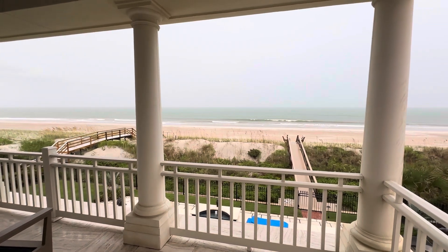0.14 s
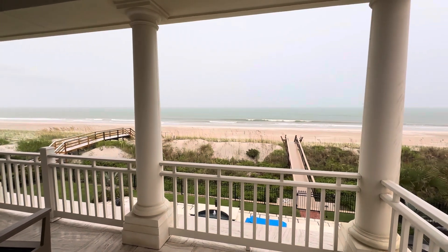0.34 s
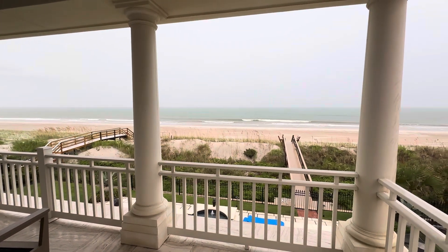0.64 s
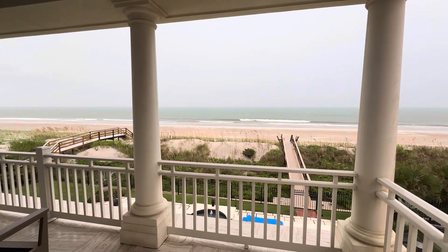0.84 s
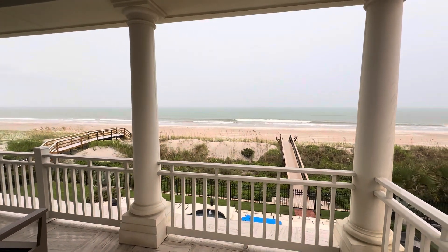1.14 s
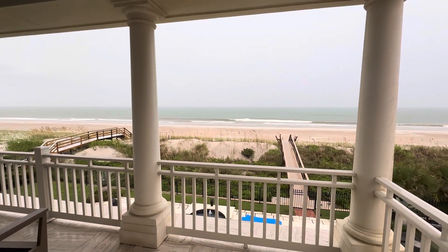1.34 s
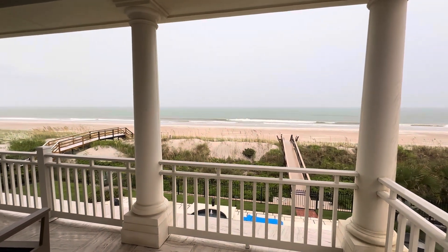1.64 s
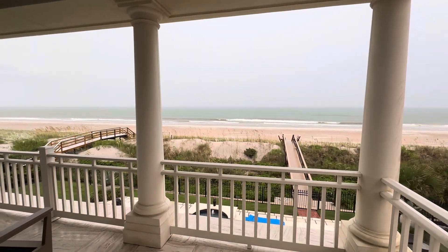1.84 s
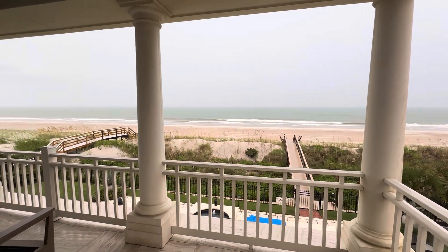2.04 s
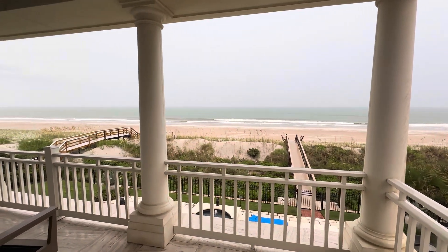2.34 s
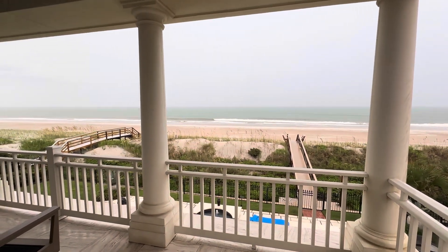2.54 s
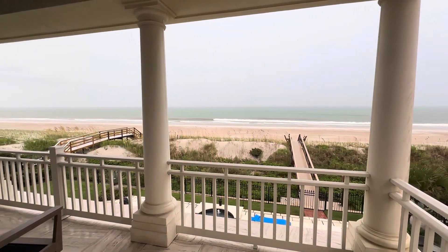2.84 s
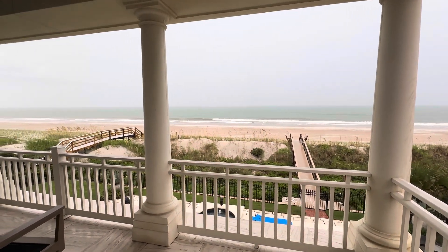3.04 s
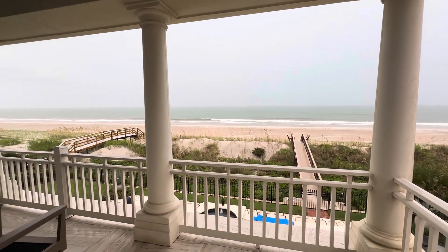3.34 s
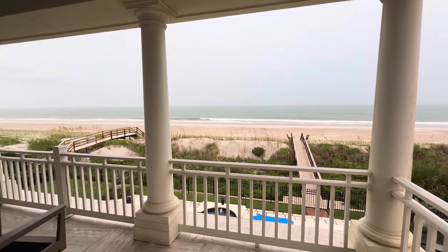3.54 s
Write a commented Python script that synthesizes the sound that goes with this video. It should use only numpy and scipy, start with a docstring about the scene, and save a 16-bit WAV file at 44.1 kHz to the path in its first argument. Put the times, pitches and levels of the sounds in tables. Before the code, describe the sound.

Low thunder rumbles from the start, swelling into dull bassy booms around 0.3-0.6 seconds, then easing. From about 1.2 it surges, loudest near 1.4-1.7, with brighter, muffled claps ringing briefly under the porch roof. It then dies away unevenly, with smaller thumps near 2.8-3.1. Soft surf and fine hiss run throughout, the hiss brighter on the right; a faint tick occurs near 0.1.

```python
"""Thunder rolls over a beach, heard from a covered wooden porch. Random shock fronts from the lightning channel
merge into an opening swell, a deep rumble and a brighter roll; bunches of them make dull booms, and from the
height of the roll on also brighter claps and cracks that ring under the roof. Behind, filtered noise makes
churning surf with breaking waves and a fine hiss, brighter on the right. One faint tick sounds early on.
Table levels are those before panning, porch echo and the final low-pass."""
import sys
import numpy as np
from scipy import signal
from scipy.fft import rfft, irfft, next_fast_len
from scipy.io import wavfile
from scipy.ndimage import uniform_filter1d

SR = 44100
rng = np.random.default_rng(int(sys.argv[2]) if len(sys.argv) > 2 else 0)


def store_pcm(level_fs):
    """Save levels as 16-bit WAV."""
    pcm = np.round(np.clip(level_fs, -1, 1) * 32767).astype(np.int16)
    wavfile.write(sys.argv[1], SR, np.atleast_2d(pcm).T)


N = 163170


def undb(db):
    """Decibels to gain."""
    return 10 ** (np.asarray(db) / 20)


def unit(x):
    """Scale to rms 1."""
    return x / np.sqrt(np.mean(x ** 2))


def curve(rows):
    """Gain over time, straight in dB between (time [s], level [dB]) points."""
    return undb(np.interp(np.arange(N) / SR, *np.array(rows).T))


def colour(x, points):
    """Causal minimum-phase filter through (frequency [Hz], gain [dB]) points."""
    size = next_fast_len(N + SR // 2, True)
    hz, db = np.array(points).T
    f = np.maximum(np.arange(size // 2 + 1) * SR / size, 1)
    gain_db = np.interp(np.log(f), np.log(hz), db)
    # folding the cepstrum onto positive time makes the response causal
    cepstrum = irfft(np.log(undb(gain_db)), size)
    cepstrum[1:size // 2] *= 2
    cepstrum[size // 2 + 1:] = 0
    response = np.exp(rfft(cepstrum))
    return irfft(rfft(x, size) * response, size)[..., :N]


def pitched(points, pitch):
    """Shift a colour along the frequency axis; a lower factor is duller."""
    return [(hz * pitch, gain) for hz, gain in points]


def walk(rate):
    """Smooth random drift of rms 1, from twice-averaged random steps at the given rate [1/s]."""
    k = max(int(SR / rate), 1)
    steps = np.repeat(rng.standard_normal(1024), k)[:N]
    return unit(uniform_filter1d(uniform_filter1d(steps, k), k))


def pan(db):
    """Left and right gains for a level difference, positive to the left."""
    return undb(np.array([[db], [-db]]) / 2)


CHURN_DB, CHURN_PER_S = 1.1, 22  # rms swing [dB], random steps per second


def churn(points):
    """Tumbling water in stereo: each half octave of the noise swells and sinks on its own."""
    size = next_fast_len(N, True)
    spectrum = rfft(colour(rng.standard_normal((2, N)), points), size)
    hz = np.arange(size // 2 + 1) * SR / size
    # everything below 260 Hz or above 4 kHz joins the outermost bands
    band = np.floor(2 * np.log2(np.clip(hz, 260, 4000))).astype(int)
    water = 0
    for k in np.unique(band):
        part = irfft(spectrum * (band == k), size)[:, :N]
        water = water + part * undb(CHURN_DB * walk(CHURN_PER_S))
    return unit(water)


# colour of a breaking wave: (frequency [Hz], relative gain [dB])
BREAKER_TONE = [(400, -27), (900, -15), (1400, 6), (1750, -2), (2300, 1.5), (2700, -13), (4000, -9),
                (5500, -25), (10000, -53)]
WAVE_RISE_S, WAVE_FADE_S = 0.32, 0.85  # Gaussian rise width, exponential fade time


def breaker(at, db, pitch):
    """A wave topples in a swelling rush of noise, which then fades exponentially."""
    t = np.arange(N) / SR - at
    rise = np.exp(-(t / WAVE_RISE_S) ** 2)
    fade = np.exp(-np.abs(t) / WAVE_FADE_S)
    shape = np.where(t < 0, rise, fade)
    return churn(pitched(BREAKER_TONE, pitch)) * shape * undb(db)


# colour of the surf's wash: (frequency [Hz], relative gain [dB])
SURF_TONE = [(60, -9.5), (200, 0.5), (380, -10.5), (520, -2), (650, -1), (920, 0.5), (1050, -5), (1350, -3),
             (1700, -6), (2100, -7), (2550, -12), (2850, -11), (3300, -18.5), (5000, -19), (9000, -35),
             (16000, -60)]
# swell of the wash: (time [s], level [dB])
SURF_SWELL = [(0, -35.5), (.3, -35.5), (.62, -33), (1.15, -31.5), (1.55, -34), (1.9, -32), (2.4, -31.5),
              (3.05, -33.5), (3.7, -34.5)]
# breaking waves, the farther one duller: (peak time [s], level [dB], pitch factor [ratio])
BREAKING_WAVES = [(.67, -37.3, 1.0), (2.2, -45.5, 1.15), (3.3, -38.5, 0.597)]


def surf():
    """A wide, churning wash of noise with waves breaking in it."""
    wash = churn(SURF_TONE) * curve(SURF_SWELL)
    waves = sum(breaker(*row) for row in BREAKING_WAVES)
    return (wash + waves) * pan(db=-1.5)


# colour of the hiss on the left: (frequency [Hz], relative gain [dB])
HISS_TONE_LEFT = [(1500, -9.5), (3300, -2), (4500, -12), (6000, -15.5), (7500, -8), (9000, -21.5),
                  (10500, -16), (12500, -35), (15500, -23)]
# colour of the hiss on the right: (frequency [Hz], relative gain [dB])
HISS_TONE_RIGHT = [(1500, -7), (3300, -9), (4400, -2), (5400, 2.5), (6300, 0), (7500, -5.5), (9000, -16.5),
                   (10500, -25), (12500, -28), (15500, -26.5)]
# swell of the hiss: (time [s], level [dB])
HISS_SWELL = [(0, -44), (.3, -43.5), (.6, -41), (1.3, -41.5), (1.75, -42), (2.05, -40), (2.7, -42.5),
              (3.7, -43)]
# brief flares of the hiss: (time [s], boost [dB], half width [s])
HISS_FLARES = [(1.51, 3, 0.022), (2.003, 3, 0.005)]


def hiss():
    """Fine hiss of foam and wind: noise brighter on the right, drifting in level, with brief flares."""
    t = np.arange(N) / SR
    left = colour(rng.standard_normal(N), HISS_TONE_LEFT)
    right = colour(rng.standard_normal(N), HISS_TONE_RIGHT)
    flare_db = sum(db * np.exp(-((t - at) / width) ** 2) for at, db, width in HISS_FLARES)
    drift_db = 0.68 * walk(22.78)
    return unit(np.array([left, right])) * curve(HISS_SWELL) * undb(flare_db + drift_db)


# early reflections of surf and hiss on the left: (delay [s], level [dB])
BOARDS_LEFT = [(.0047, -16), (.0093, -20), (0.0157, -21)]
# early reflections of surf and hiss on the right: (delay [s], level [dB])
BOARDS_RIGHT = [(.0039, -31), (.0108, -15.5), (0.0145, -19.5)]


def reflected(pair):
    """The nearest boards mirror the steady sounds; delayed copies give a slightly hollow colour."""
    sides = []
    for x, rows in zip(pair, (BOARDS_LEFT, BOARDS_RIGHT)):
        copies = sum(undb(db) * np.roll(x, int(delay * SR)) for delay, db in rows)
        sides.append(unit(x + copies) * np.std(x))  # the overall level stays as it was
    return np.array(sides)


# colour of the tick: (frequency [Hz], relative gain [dB])
TICK_TONE = [(1500, -40), (2600, -7), (3100, 1), (3500, -16), (6000, -26), (16000, -60)]
TICK_S, TICK_HALF_WIDTH_S, TICK_DB = .118, .005, -40


def tick():
    """One short, faint tick: coloured noise under a Gaussian bump."""
    t = np.arange(N) / SR - TICK_S
    noise = unit(colour(rng.standard_normal(N), TICK_TONE))
    return noise * np.exp(-(t / TICK_HALF_WIDTH_S) ** 2) * undb(TICK_DB)


SHOCKS_PER_S, SHOCK_SPREAD_DB = 1800, 2  # mean rate, rms spread of strength


def shocks():
    """Shock fronts that arrive at random, of either sign and uneven strength."""
    arrives = rng.random(N) < SHOCKS_PER_S / SR
    sign = np.sign(rng.standard_normal(N))
    return arrives * sign * undb(SHOCK_SPREAD_DB * rng.standard_normal(N))


# porch resonances: (frequency [Hz], width [Hz], gain at the centre [dB])
ROOF_MODES = [(289, 10, .5), (365.3, 7, -.5), (650, 16, -8.5)]


def ring(x):
    """Sound under the porch roof rings at a few pitches, added by resonant filters."""
    return x + sum(undb(db) * signal.lfilter(*signal.iirpeak(hz, hz / width, SR), x)
                   for hz, width, db in ROOF_MODES)


def rolling(levels, points, even_s):
    """A stream of shocks dulled by distance; it flutters quickly while its mean strength follows the swell."""
    x = unit(ring(colour(shocks(), points)))
    mean_power = uniform_filter1d(x ** 2, max(int(even_s * SR), 2))
    return x / np.sqrt(np.maximum(mean_power, 1e-6)) * curve(levels)


def burst(start, db, length, points, tail_s, pitch=1):
    """A bunch of shocks from one bend of the channel: sudden start, hold, quick exponential fall."""
    t = np.arange(N) / SR
    shape = (t >= start) * np.exp(-np.maximum(t - start - length, 0) / tail_s)
    x = ring(colour(shocks() * shape, pitched(points, pitch)))
    # the level is the rms spread over hold plus tail
    return x * undb(db) * np.sqrt((length + tail_s) * SR / np.sum(x ** 2))


# level of the opening swell: (time [s], level [dB])
OPENING_SWELL = [(0, -38), (.2, -27), (.33, -24), (.6, -25), (.88, -28), (1.15, -33.5), (1.7, -37),
                 (3.7, -71)]
# its colour, a little higher in pitch than the rumble: (frequency [Hz], relative gain [dB])
OPENING_TONE = [(20, -39), (50, -16), (75, 1.5), (96, 4.5), (125, 4), (165, -6), (205, -11), (260, -7.5),
                (350, -32.5), (450, -50), (800, -57), (5000, -120)]


def opening():
    """The opening swell: a stream of shocks that soon sinks away."""
    return rolling(OPENING_SWELL, OPENING_TONE, even_s=0.043)


# level of the deep rumble: (time [s], level [dB])
RUMBLE_SWELL = [(0, -28.5), (.25, -34), (.55, -32.5), (.72, -25.5), (1.0, -26), (1.17, -31), (1.34, -20),
                (1.62, -23), (1.78, -24), (1.92, -23), (2.1, -27), (2.31, -33.5), (2.38, -28), (2.9, -29.5),
                (3.25, -28), (3.38, -27), (3.7, -34)]
# colour of the rumble: (frequency [Hz], relative gain [dB])
RUMBLE_TONE = [(15, -45), (30, -21.5), (45, -8), (64, 1.5), (86, 0), (128, -4.5), (170, -10.5), (250, -21),
               (400, -40.5), (800, -62), (5000, -120)]


def rumble():
    """Countless shocks merged into a deep rumble."""
    return rolling(RUMBLE_SWELL, RUMBLE_TONE, even_s=0.065)


# booms: (start time [s], level [dB], length [s])
BOOM_HITS = [(0.297, -21.5, 0.011), (.321, -16, 0.017), (0.383, -24, .02), (0.421, -21, 0.017),
             (0.463, -19, .024), (0.543, -21, 0.012), (1.324, -19, .018), (1.574, -17, 0.019),
             (1.847, -22, 0.024), (2.022, -23, 0.02), (2.18, -22, 0.019), (2.367, -32, 0.01),
             (2.885, -28.5, 0.0067), (2.931, -24.5, 0.0078), (3.124, -27, 0.012), (3.621, -35, 0.022)]
# colour of the booms: (frequency [Hz], relative gain [dB])
BOOM_TONE = [(20, -41), (50, -25), (76, 0.5), (110, 4.5), (150, -4.5), (220, -22.5), (400, -43), (800, -66),
             (5000, -120)]


def booms():
    """Dull booms: bunched shocks with only the bass left."""
    return sum(burst(start, db, length, BOOM_TONE, tail_s=0.0063) for start, db, length in BOOM_HITS)


# level of the brighter roll: (time [s], level [dB])
ROLL_SWELL = [(0, -35.5), (.12, -39), (.22, -34), (.6, -35.5), (1.19, -34), (1.26, -23), (1.39, -20.5),
              (1.53, -27), (1.63, -28), (1.7, -24.5), (1.87, -30), (2.1, -31), (2.33, -33.5), (2.48, -32.5),
              (2.62, -33.5), (2.85, -33), (3.05, -32.5), (3.7, -33.5)]
# colour of the roll: (frequency [Hz], relative gain [dB])
ROLL_TONE = [(30, -30.5), (55, -33.5), (110, -8), (165, -1.5), (200, -2), (235, 2), (290, -2.5), (330, -2),
             (390, -4.5), (445, -8), (520, -15), (680, -11.5), (900, -24.5), (1400, -38), (3000, -67.5),
             (10000, -115)]


def roll():
    """The brighter roll: a stream of shocks that keeps more of its middle range."""
    return rolling(ROLL_SWELL, ROLL_TONE, even_s=.05)


# claps: (start time [s], level [dB], length [s], pitch factor [ratio])
CLAP_HITS = [(1.235, -26, .03, 1.2), (1.32, -18, 0.025, 1.05), (1.363, -22, 0.062, .87),
             (1.44, -12, 0.036, 0.984), (1.482, -16.5, .009, 1.01), (1.557, -15, 0.039, 1.05),
             (1.656, -17, 0.02, 0.81), (1.794, -27.5, 0.04, 1.05), (1.91, -22.5, 0.0089, 0.92),
             (1.948, -25, 0.033, 0.81), (2.121, -28, .025, 0.88), (2.24, -31.5, 0.0079, 1.25),
             (2.385, -29.5, .035, .76), (2.427, -23, 0.03, 0.94), (2.496, -31, 0.031, 1.23),
             (2.658, -30.5, 0.037, 0.84), (2.77, -27, 0.024, 0.76), (2.786, -20.5, .028, .84),
             (2.83, -27, 0.021, 0.89)]
# colour of the claps at pitch factor 1: (frequency [Hz], relative gain [dB])
CLAP_TONE = [(20, -54), (45, -16), (100, -13.5), (165, -1.5), (200, -5), (235, 3), (290, 3), (335, -6),
             (380, -6), (445, -12.5), (530, -27.5), (720, -19.5), (950, -33.5), (1500, -40), (3000, -74),
             (10000, -120)]


def claps():
    """Brighter claps: bunched shocks, each with its own pitch."""
    return sum(burst(start, db, length, CLAP_TONE, tail_s=0.0053, pitch=pitch)
               for start, db, length, pitch in CLAP_HITS)


# cracks beside the big claps: (start time [s], level [dB], length [s])
CRACK_HITS = [(1.442, -28.5, 0.019), (1.559, -32.5, 0.019), (1.643, -34, 0.014)]
# colour of the cracks: (frequency [Hz], relative gain [dB])
CRACK_TONE = [(100, -26), (400, -10), (520, -8), (620, 3.5), (720, -3), (860, -4), (1000, -20), (1500, -26),
              (10000, -110)]


def cracks():
    """The sharpest shock fronts: bursts higher in pitch, with the shortest tail."""
    return sum(burst(start, db, length, CRACK_TONE, tail_s=0.0034) for start, db, length in CRACK_HITS)


# sideways echo of the porch against the direct sound: (frequency [Hz], gain [dB])
PORCH_SIDE_TONE = [(30, -19), (90, -15.5), (175, -6.5), (280, -14), (370, -6.5), (490, 5.5), (650, -5.5),
                   (1000, -2)]
PORCH_T60_S, PORCH_DELAY_S = 0.16, 0.0075  # decay and onset of the noise before its spectrum is flattened


def porch(x):
    """Roof, floor and wall throw a short noise-like echo, opposite in sign at left and right."""
    t = np.arange(SR // 2) / SR
    decay = np.exp(-np.log(1000) * t / PORCH_T60_S)
    echo = rng.standard_normal(len(t)) * decay * (t > PORCH_DELAY_S)
    # keep the phase only, so that the echo has no colour of its own
    even_echo = irfft(np.exp(1j * np.angle(rfft(echo))))[:len(t) // 2]
    side = colour(signal.fftconvolve(x, even_echo)[:N], PORCH_SIDE_TONE)
    return np.array([x + side, x - side])


def thunder():
    """Swell, rumble and booms below, roll, claps and cracks above, each group with its own porch echo."""
    low = opening() + rumble() + booms()
    high = roll() + claps() + cracks()
    return porch(low) * pan(db=2.0) + porch(high) * pan(db=0.05)


def scene():
    """Thunder over surf and hiss, with one tick."""
    return reflected(surf() + hiss()) + tick() + thunder()


def record(dry):
    """A steep low-pass leaves nothing above about 15.7 kHz."""
    return signal.sosfilt(signal.ellip(8, .2, 80, 15700, fs=SR, output="sos"), dry)


dry = scene()
out = record(dry)
store_pcm(out)
```